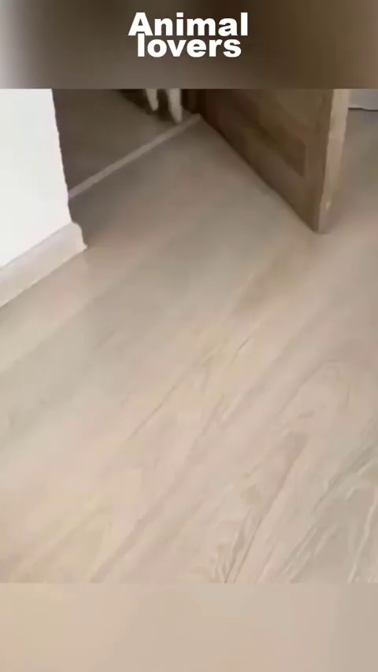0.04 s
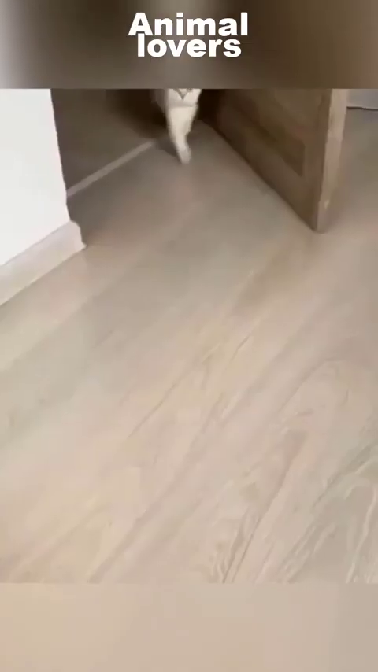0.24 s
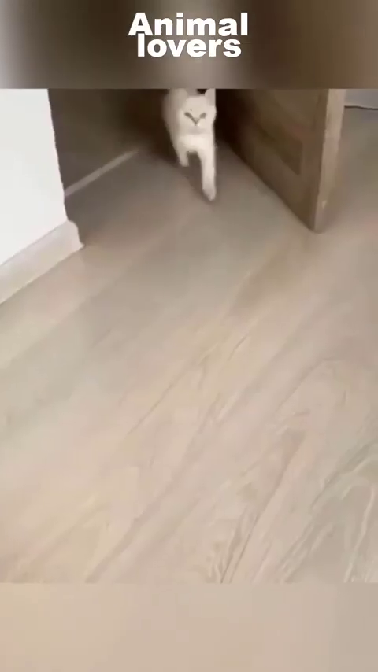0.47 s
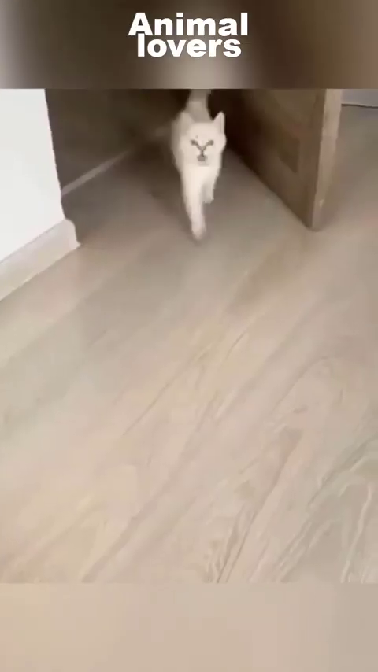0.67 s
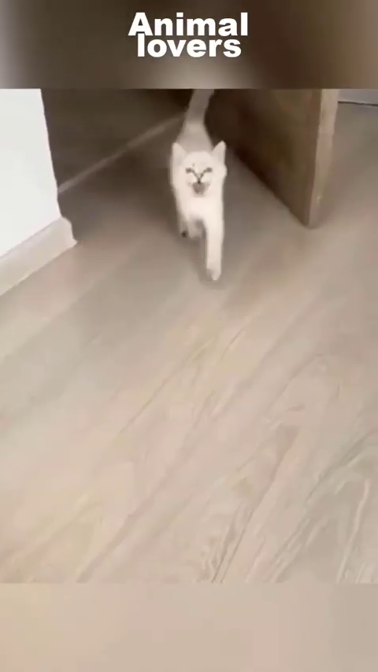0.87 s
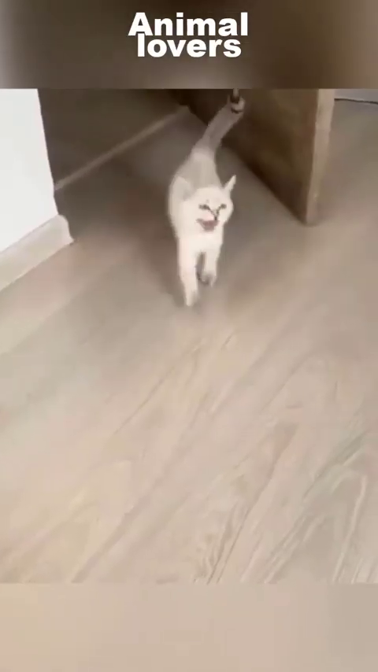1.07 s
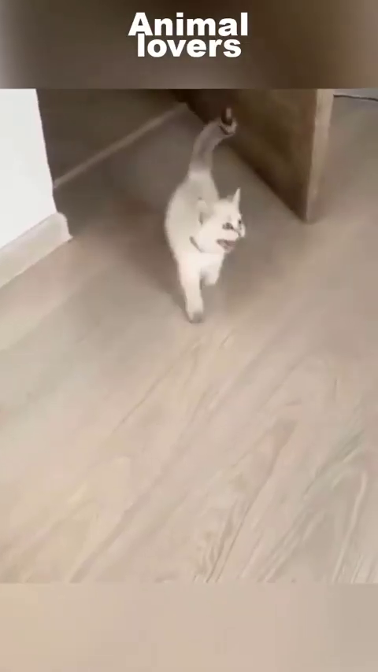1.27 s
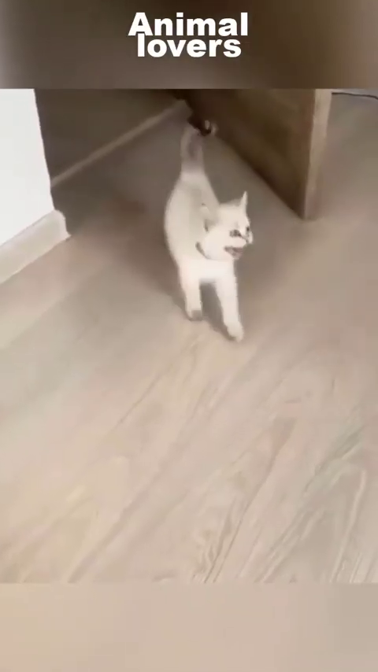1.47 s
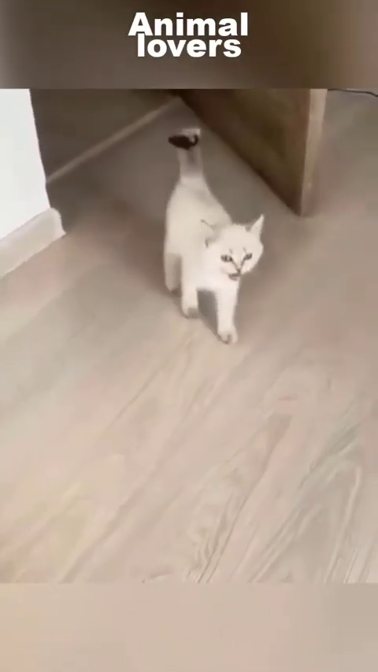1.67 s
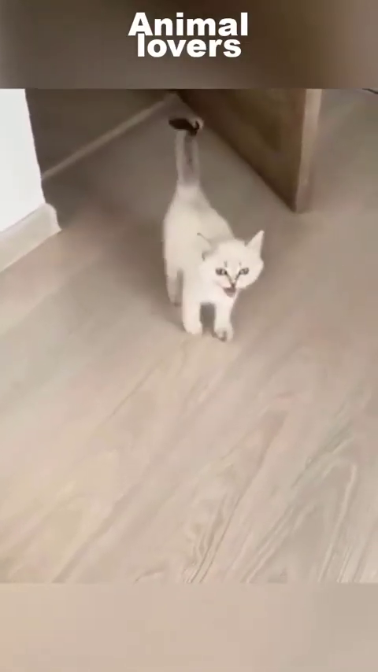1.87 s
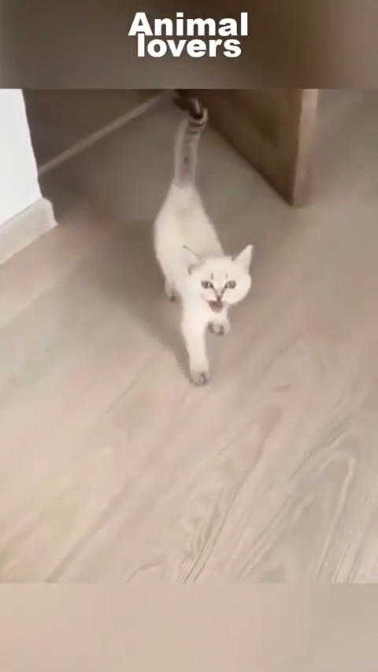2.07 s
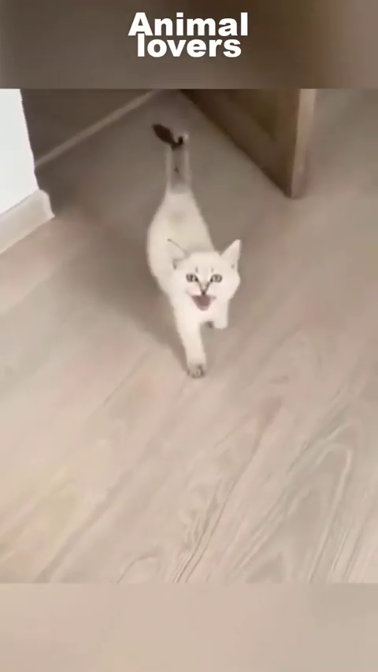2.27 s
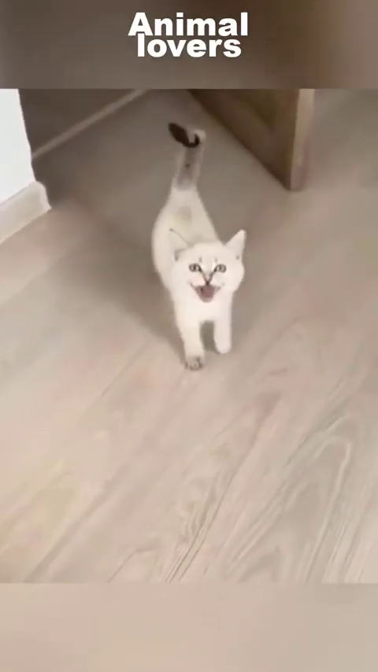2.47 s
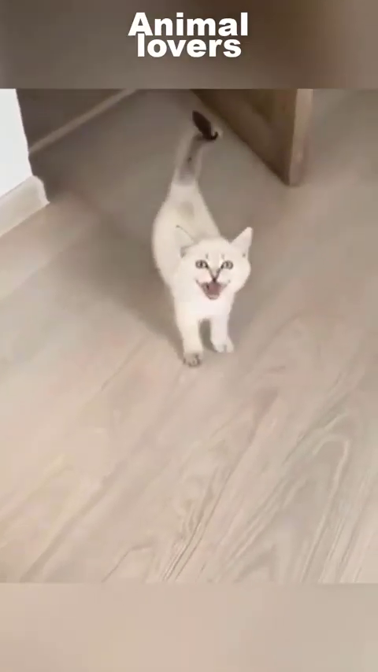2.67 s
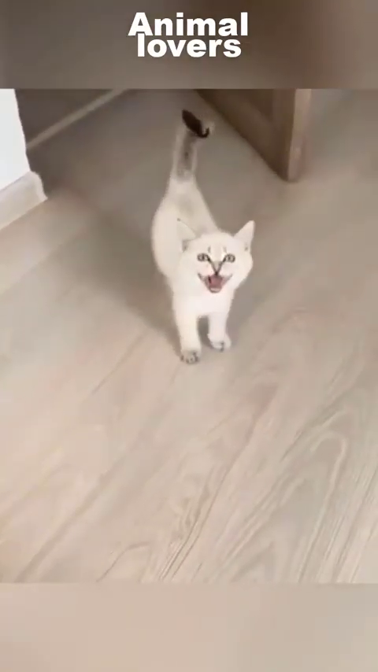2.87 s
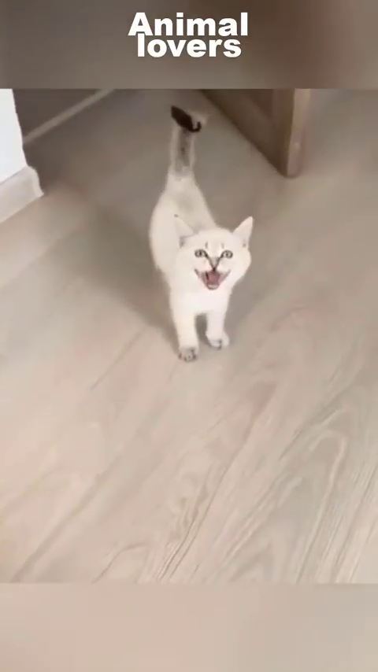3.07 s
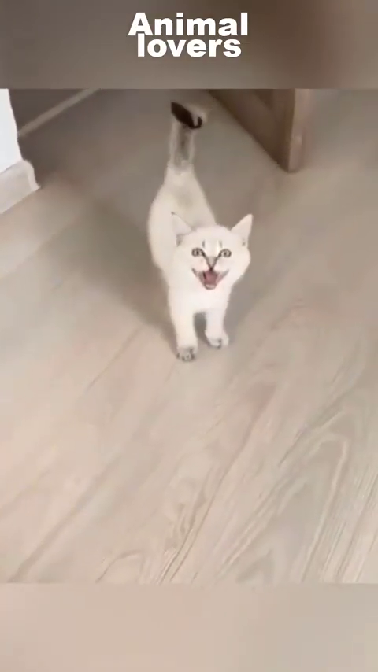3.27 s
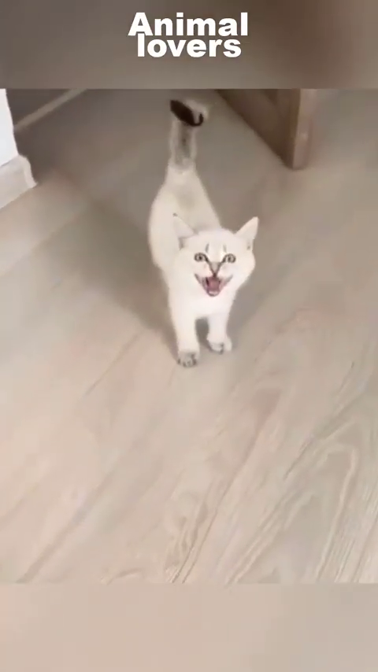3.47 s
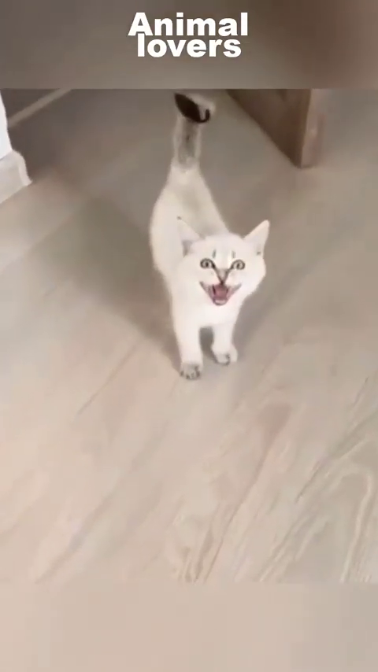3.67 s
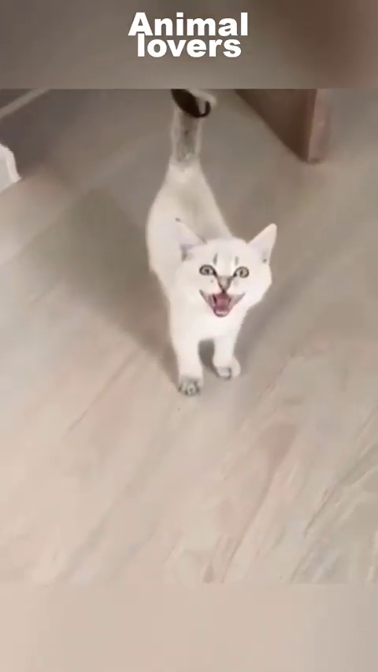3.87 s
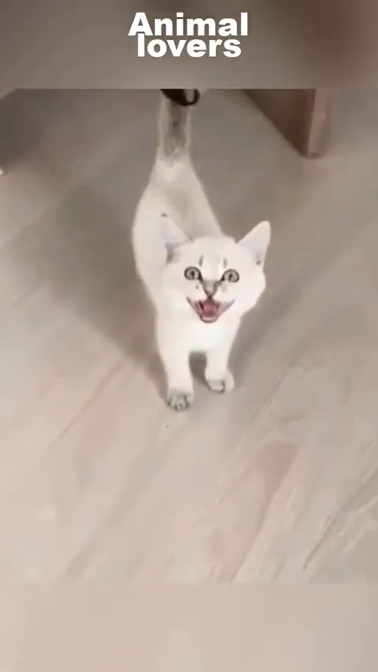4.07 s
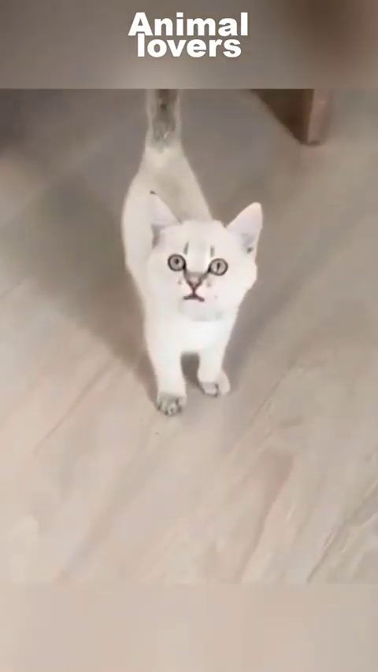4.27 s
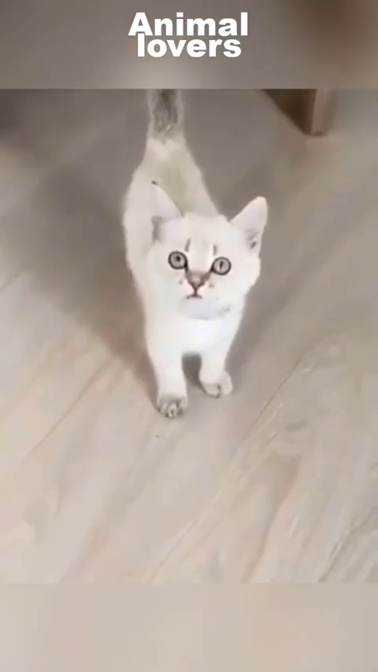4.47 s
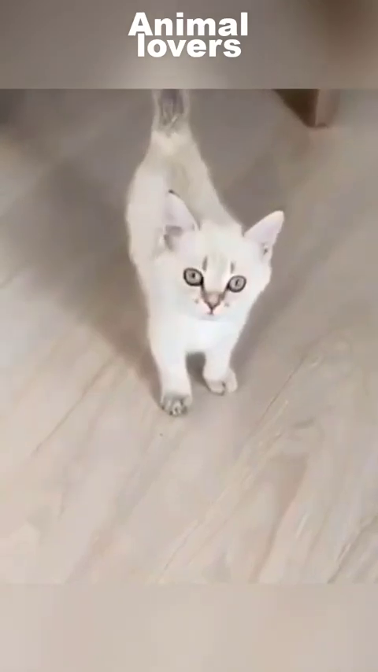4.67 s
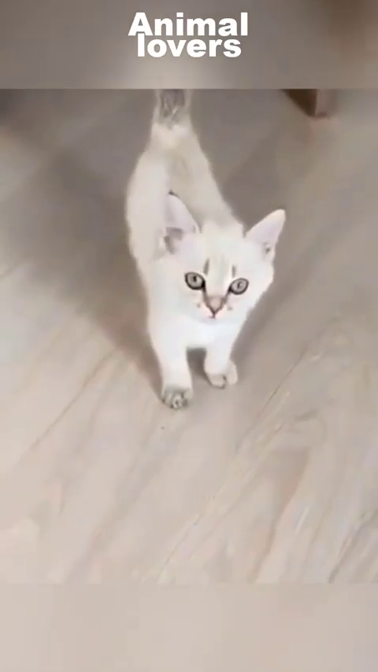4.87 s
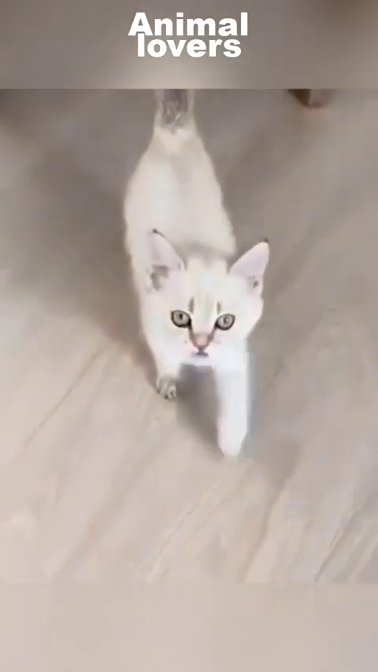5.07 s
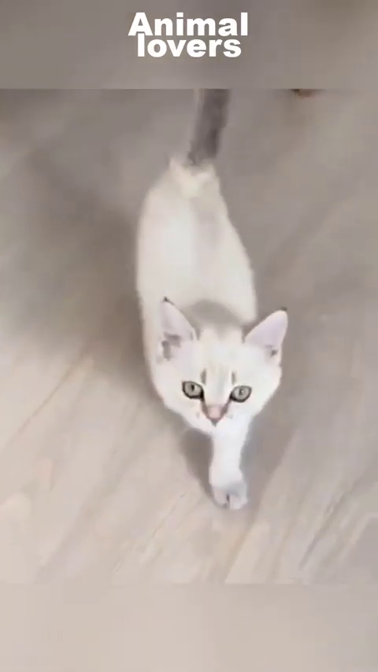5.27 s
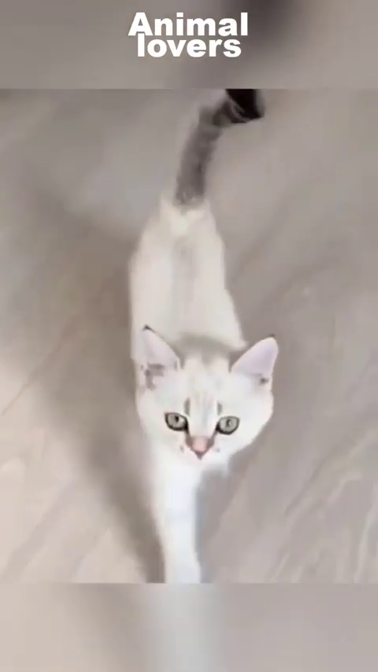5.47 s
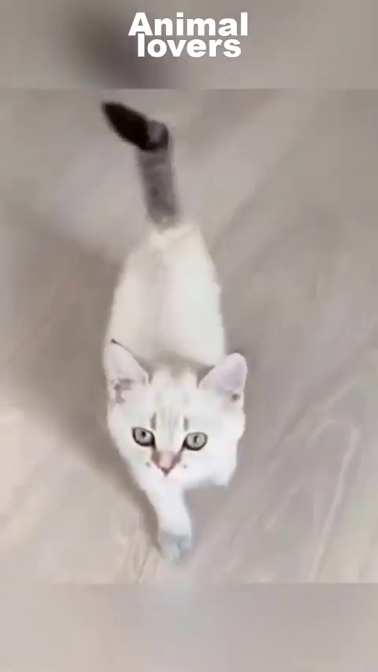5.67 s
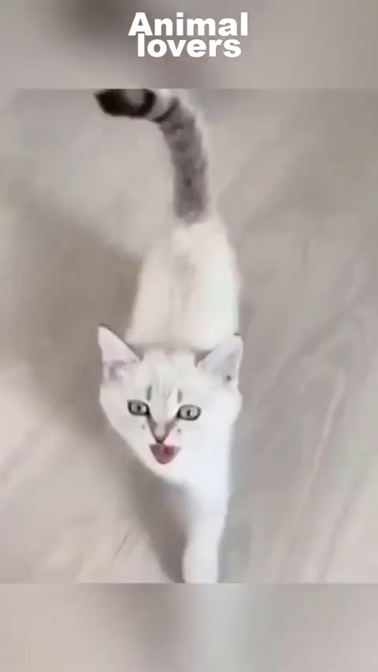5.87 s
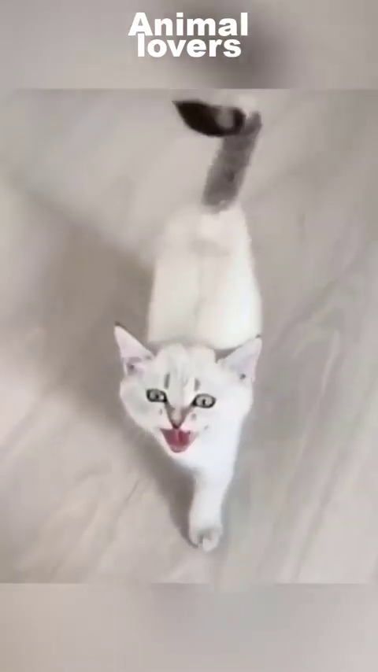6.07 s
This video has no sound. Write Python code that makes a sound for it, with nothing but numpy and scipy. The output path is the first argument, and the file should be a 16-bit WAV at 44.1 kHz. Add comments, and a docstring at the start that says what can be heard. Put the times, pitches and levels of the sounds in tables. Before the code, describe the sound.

One drawn-out, slowly falling kitten meow rings through a room, followed by soft paw steps on wood and a brief hoarse cry.

```python
"""A kitten on a wooden floor, in a bare, ringing room with a low rumble. First soft bumps, paws, wet smacks.
At 1 s one long, high meow: vocal folds through throat resonances, sinking in pitch, swelling as the mouth
widens. At 4.2 s the folds break into a rasp; the jaw snaps shut, pulling pitch and resonances down.
From 5 s claws tick, paws shuffle on the boards, the mouth smacks; echoes weaken as the kitten nears.
At 6 s a rough second cry begins."""
import sys
import numpy as np
from scipy import signal
from scipy.fft import rfft, irfft, next_fast_len
from scipy.io import wavfile
from scipy.ndimage import uniform_filter1d

SR = 44100
rng = np.random.default_rng(int(sys.argv[2]) if len(sys.argv) > 2 else 0)


def transcribe(signal):
    """Save signal, clipped to [-1, 1], as a 16-bit WAV file at the path in sys.argv[1]."""
    frames = np.atleast_2d(signal).T
    limited = np.clip(frames, -1, 1)
    pcm = np.round(limited * 32767).astype(np.int16)
    wavfile.write(sys.argv[1], SR, pcm)


N = 270333
TIME_S = np.arange(N) / SR

# meow melody: t/s, f/Hz
MEOW_PITCH = [(1.02, 866), (1.06, 910), (1.088, 989), (1.12, 962), (1.185, 973), (1.205, 1012),
              (1.235, 1022), (1.252, 990), (1.28, 935), (1.318, 921), (1.35, 919), (1.4, 903.6),
              (1.425, 910), (1.52, 866), (1.585, 840), (1.73, 845), (1.755, 819), (1.89, 824.6),
              (1.92, 851), (1.97, 854), (2.03, 877), (2.06, 897), (2.2, 902), (2.23, 887), (2.33, 893.3),
              (2.36, 868.5), (2.44, 846.4), (2.475, 858.7), (2.63, 842.6), (2.81, 844.4), (2.86, 823.4),
              (3.2, 812.5), (3.23, 799.4), (3.32, 809.6), (3.6, 806.5), (3.62, 796.6), (3.76, 803.5),
              (3.86, 786.4), (4.05, 788.8), (4.12, 782.2), (4.33, 784.2)]
# brief pitch dips: t/s, half length/s, depth/fraction of pitch
PITCH_CATCHES = [(1.677, 0.0088, 0.055), (1.884, 0.012, 0.019), (4.026, 0.0067, 0.011),
                 (4.201, 0.0078, 0.016), (4.241, 0.00748, 0.0794), (4.273, 0.00809, 0.0733),
                 (4.297, .006, 0.0492), (4.326, 0.00811, 0.0875), (4.357, 0.012, 0.14)]
# mouth: t/s, opening/0-1
MOUTH_OPENING = [(1., 0.51), (1.27, 0.1), (1.6, 0.28), (1.85, 0.06), (2.15, 0.29), (2.45, 0.75),
                 (3.3, 0.55), (3.62, 0.88), (4.18, 0.99), (4.3, 0.99)]
# throat response by mouth opening: f/Hz, narrow/dB, half open/dB, wide/dB
THROAT_RESPONSE = [(394.2, -32, -26, 5), (847, -8, -13.5, -10), (1598, 4, -2.5, 1.5), (2475, 3, 1, 3.5),
                   (3160, -11, -2.5, -1), (3398, 1.5, 2.5, 1.5), (3606, -6.5, 4, 6.5),
                   (3950, -16.5, -0.5, 13.5), (4317, -15.5, -4, 2), (4900, -11.5, -6, -6.5),
                   (5200, -6, 4, -8), (5540, -5, -10, -3.5), (6460, -22, -24, -14.5), (7050, -58, -86, -49),
                   (7680, -29, -15, -28), (8450, -25, -19, -15), (8960, -14, -18.5, -22),
                   (9340, -25.5, -16.5, -15), (10860, -19.5, -24.5, -22), (12570, -49, -34, -35)]
# folds take hold in two pushes, let go at the end: t/s, gain/1
FOLD_GRIP = [(1.01, 0), (1.03, .6), (1.06, .7), (1.095, 1.2), (1.16, .7), (1.21, .65), (1.26, 1.15),
             (1.35, 1), (4.22, 1), (4.25, .85), (4.38, .75), (4.43, .15)]
# fold rattle fraying the harmonics: t/s, depth/0-1
FOLD_RATTLE = [(1.0, .5), (1.1, .85), (1.22, .55), (1.27, .25), (1.34, .6), (1.43, .05), (1.6, .08),
               (1.68, .7), (1.76, .08), (2.2, 0), (3.4, 0), (3.7, .07), (4.2, .1)]
# voice cracks: t/s, time constant/s, added roughness/0-1
VOICE_CRACKS = [(1.275, 0.032, 0), (1.687, 0.11, 0.2), (2.367, 0.099, 0.04), (2.961, 0.072, 0.08),
                (3.722, 0.07, 0.01)]
# bright breath before the break: f/Hz, level/dB
WHISPER_SPECTRUM = [(400, -21), (1100, -14), (2000, 9), (3500, 5), (5700, 3), (7300, 5), (9800, -8),
                    (13000, -24)]
# darker breath after it: f/Hz, level/dB
RASP_SPECTRUM = [(300, -7), (600, -1), (1100, 7), (1800, 0), (2800, 3), (4200, -2.5), (5700, 1.5),
                 (7300, -25), (10000, -4), (13000, -21)]
# air pushes of the second cry: t/s, level/dB, fade/(dB/s)
CRY_PUSHES = [(6.016, -41, 13), (6.109, -30, 452)]
# throat in the second cry: f/Hz, level/dB
CRY_SPECTRUM = [(300, -8), (850, -3), (2200, -4.5), (3200, -10), (4800, -12), (7000, -22), (12000, -22)]
# lip and tongue smacks: t/s, level/dB, time constant/s, treble/dB
SMACKS = [(0.388, -41.5, 0.0016, 5), (0.789, -43, 0.0031, 6), (0.943, -27.5, 0.00043, 9),
          (1.046, -26, 0.0018, 17), (4.449, -15.5, 0.0031, -9), (5.539, -17, 0.0021, -3),
          (5.799, -26, 0.006, -4.5), (6.0154, -9.5, 0.0011, -8)]
# mouth cavity: f/Hz, width/Hz, level/dB
MOUTH_MODES = [(1003, 590, 1), (1505, 490, 4), (3770, 1120, 1.5), (4830, 2300, 8.5), (10300, 2800, -7)]
# claw ticks: t/s, level/dB
CLAW_TICKS = [(5.05, -37), (5.110, -35), (5.239, -37), (5.336, -37), (5.485, -38)]
# boards under a claw: f/Hz, width/Hz, level/dB
BOARD_MODES = [(1060, 550, 9.5), (2190, 550, 8.5), (4440, 1400, -25)]
# paws and fur on the floor: t/s, half length/s, thud/dB, scuff/dB
SHUFFLES = [(0.56, 0.084, -44, -69.5), (0.794, 0.06, -52, -70), (5.212, 0.12, -40.5, -63),
            (5.308, 0.072, -51, -57.5), (5.55, 0.034, -43, -76), (5.816, 0.081, -45.5, -52.5),
            (5.973, 0.11, -44.5, -70)]
# boards under a paw: f/Hz, level/dB
THUD_SPECTRUM = [(25, -40), (59, 12), (100, 1.5), (151, 2), (294, 6.5), (527, -14), (960, -17), (1630, -40),
                 (2260, -22.5), (6000, -41), (7800, -64), (13200, -120)]
# paws and fur rubbing: f/Hz, level/dB
SCUFF_SPECTRUM = [(1000, -19), (3000, -3), (5000, -6), (7300, -19), (10000, -4.5), (13000, -16)]
# dull bumps: t/s, level/dB, f/Hz, width/Hz, time constant/s
BUMPS = [(0.472, -36, 275, 133, 0.018), (0.622, -41, 109, 90, 0.0088), (1.003, -43, 660, 413, 0.0046),
         (3.377, -44, 600, 262, 0.04), (5.782, -33, 82, 71, 0.025), (3.712, -23, 505, 190, .008),
         (4.457, -20.5, 200, 150, .006), (4.468, -28, 370, 220, .012)]
# reverberation time: f/Hz, T60/s
ROOM_DECAY = [(150, 1.1), (2000, 1.2), (3900, 0.78), (6000, 0.85), (9000, 0.5), (14000, 0.55)]
# echo colour: f/Hz, level/dB
ECHO_SPECTRUM = [(200, -5.5), (600, -2.5), (3000, 1.5), (6000, 2.5), (9000, 4.0)]
# room noise: f/Hz, level/dB
BACKGROUND_SPECTRUM = [(25, -12), (62, 1.5), (110, -4), (200, -8.5), (400, -17), (1000, -23), (3000, -31.5),
                       (6000, -34), (8000, -44.5), (13000, -42.5)]

MEOW_START_S, BREAK_S, CRUMBLE_S, MEOW_END_S = 0.94, 4.201, 4.22, 4.444


def meow(jaw_close_s=4.335, pitch_drop=0.1187, throat_drop=0.32, wide_mouth_db=8):
    """Folds, croak and breath, louder through a wide mouth; the closing jaw lowers pitch and throat."""
    level_db, rough = effort()
    closing = ramp(jaw_close_s, 0.1) ** 2
    catch = sum(depth * swell(t_s, half_s) for t_s, half_s, depth in PITCH_CATCHES)
    pitch_hz = curve(MEOW_PITCH) * (1 - catch - pitch_drop * closing)
    opening = curve(MOUTH_OPENING)
    throat_scale = 1 - throat_drop * closing
    air = breath(rough)
    voice = curve(FOLD_GRIP) * vocal_folds(pitch_hz, rough, opening, throat_scale)
    gate = uniform_filter1d(1. * ((TIME_S >= MEOW_START_S) & (TIME_S <= MEOW_END_S)), size=200)
    return (voice + croak(throat_scale) + air) * undb(level_db + wide_mouth_db * opening) * gate


def effort(attack_db=17.5, swell_db_per_s=2, fade_db_per_s=31, settle_s=0.14):
    """Meow level/dB and roughness/0-1: the folds start hoarse, settle, swell, then break up."""
    held_s = np.minimum(since(MEOW_START_S), BREAK_S - MEOW_START_S)
    onset_db = -34.5 - attack_db * (1 - ramp(MEOW_START_S, 0.3))
    level_db = onset_db + swell_db_per_s * held_s - fade_db_per_s * since(BREAK_S)
    hoarse = 0.9 * np.exp(-held_s / settle_s)
    cracks = sum(depth * np.exp(-np.abs(TIME_S - t_s) / tau_s) for t_s, tau_s, depth in VOICE_CRACKS)
    crumble = ramp(CRUMBLE_S, 0.18) ** 2
    return level_db, np.clip(0.03 + hoarse + cracks + crumble, 0, 1)


def vocal_folds(pitch_hz, rough, opening, throat_scale, jitter=0.0758, shimmer=0.065, flutter_db=0.72):
    """Fold harmonics shaped by the throat; roughness shakes their rate and swing."""
    tremble = 0.0027 * wander(28) + .03 * rough * wander(45)
    fold_hz = pitch_hz * (1 + tremble + jitter * rough ** 2 * wander(614))
    phase = 2 * np.pi * np.cumsum(fold_hz) / SR
    rattle = curve(FOLD_RATTLE)
    tone, power = 0, 0
    for k in range(1, 18):
        gain = throat_gain(k * pitch_hz, opening, throat_scale)
        skirt = .8 * rough * np.sqrt(k)  # sidebands from uneven closures
        fray = rattle * wander(120)
        swing = 1 + skirt * wander(60 + 10 * k)
        tone += gain * (swing * np.sin(k * phase) + fray * np.cos(k * phase))
        power += gain ** 2 * (1 + skirt ** 2 + rattle ** 2) / 2
    return tone / np.sqrt(power) * (1 + shimmer * rough * wander(120)) * undb(flutter_db * wander(35))


def throat_gain(f_hz, opening, throat_scale, strain_s=4.06, strain_db=6.5):
    """A wider mouth brings out the resonance near 4 kHz; strain lifts the top overtones."""
    grid_hz, *shapes_db = np.transpose(THROAT_RESPONSE)
    gain_db = 0
    for i, shape_db in enumerate(shapes_db):
        share = np.maximum(1 - np.abs(2 * opening - i), 0)
        gain_db += share * np.interp(f_hz / throat_scale, grid_hz, shape_db)
    return undb(gain_db + strain_db * ramp(strain_s, 0.074) * (f_hz > 6900))


def breath(rough, whisper_db=3, rasp_db=-5):
    """Air hisses past the teeth as the folds lose grip; after the break their flapping chops it."""
    flaps = 1 + .3 * wander(200)
    whisper = undb(whisper_db) * unit(colour(noise(), WHISPER_SPECTRUM))
    rasp = undb(rasp_db) * unit(flaps * colour(noise(), RASP_SPECTRUM))
    return np.where(TIME_S < BREAK_S, whisper, rasp) * rough ** 3


def croak(throat_scale, resonance_hz=3550, half_width_hz=525, level_db=-2):
    """Turbulence in a throat resonance that sinks with the jaw, chopped by the flapping folds."""
    carrier = np.sin(2 * np.pi * np.cumsum(resonance_hz * throat_scale) / SR)
    turbulence = carrier * wander(half_width_hz)
    flaps = 1 + 0.5 * wander(170)
    return undb(level_db) * unit(turbulence * flaps) * ramp(CRUMBLE_S, MEOW_END_S - CRUMBLE_S) ** 2


def second_cry(start_hz=670, rise_hz_per_s=520):
    """Hoarse, barely pitched air through the throat: a soft push, then a hard one."""
    pitch_hz = start_hz + rise_hz_per_s * since(CRY_PUSHES[0][0])
    push = sum((TIME_S > t_s) * undb(db - db_per_s * since(t_s)) for t_s, db, db_per_s in CRY_PUSHES)
    air = unit(colour(noise(), CRY_SPECTRUM))
    phase = 2 * np.pi * np.cumsum(pitch_hz * (1 + 0.14 * wander(220))) / SR
    return air * (1 + 0.15 * np.sin(phase)) * push


def smacks():
    """A saliva film tears; the crackle rings the mouth cavity."""
    sound = 0
    for t_s, level_db, tau_s, treble_db in SMACKS:
        modes = [(f_hz, width_hz, db + treble_db * (f_hz > 3000)) for f_hz, width_hz, db in MOUTH_MODES]
        sound += burst(t_s, level_db, tau_s, modes)
    return sound


def claws(tau_s=0.0014):
    """Claws tick on the boards and ring them briefly."""
    return sum(burst(t_s, level_db, tau_s, BOARD_MODES) for t_s, level_db in CLAW_TICKS)


def paws(contacts_per_s=900, spread_db=7.5):
    """Swells of tiny contacts thud in the boards, a thin scuff above."""
    contacts = (rng.random(N) < contacts_per_s / SR) * np.sign(noise())
    force = undb(spread_db * np.minimum(rng.exponential(size=N), 4))
    thud = unit(colour(contacts * force, THUD_SPECTRUM))
    scuff = unit(colour(noise(), SCUFF_SPECTRUM))
    return sum(swell(t_s, half_s) * (undb(thud_db) * thud + undb(scuff_db) * scuff)
               for t_s, half_s, thud_db, scuff_db in SHUFFLES)


def bumps():
    """Soft knocks, each with one short, low ring."""
    return sum(burst(t_s, db, tau_s, [(f_hz, width_hz, 0)]) for t_s, db, f_hz, width_hz, tau_s in BUMPS)


def room_echoes(x, shift_hz=1.8, gain_db=1.83):
    """The kitten moves, so its echoes drift between two patterns."""
    angle = 2 * np.pi * shift_hz * np.cumsum(1 + wander(3)) / SR
    shares = np.cos(angle), np.sin(angle)
    wet = sum(signal.fftconvolve(x * share, room_response())[:N] for share in shares)
    return undb(gain_db) * colour(wet, ECHO_SPECTRUM)


def room_response(early_db=-7, early_t60_s=0.15, late_db=-13.5):
    """Near floor and walls answer at once; the room rings on, losing treble first."""
    t_s = TIME_S[:SR]
    f_hz = np.fft.rfftfreq(SR, 1 / SR)
    spectrum = rfft(rng.standard_normal(SR))
    edges_hz = np.append(0, np.geomspace(200, SR / 2, num=14))
    late = 0
    for low_hz, high_hz in zip(edges_hz, edges_hz[1:]):
        band = irfft(spectrum * ((f_hz >= low_hz) & (f_hz < high_hz)), SR)
        late += band * undb(-60 * t_s / lookup(ROOM_DECAY, (low_hz + high_hz) / 2))
    late *= np.clip((t_s - .008) / 0.0015, 0, 1)
    reflections = rng.standard_normal(SR) * (rng.random(SR) < .03) * (t_s > .003)
    early = reflections * undb(-60 * t_s / early_t60_s)
    return (undb(early_db) * unit(early) + undb(late_db) * unit(late)) / np.sqrt(SR)


def background(full_s=0.212, dip_s=0.051, grow_s=3.4, grow_db_per_s=3):
    """Wavering rumble under an even hiss: starts faint, dips briefly, comes in fully, later grows."""
    lead_in_db = np.where(TIME_S < full_s - dip_s, -68, -95)
    level_db = np.where(TIME_S < full_s, lead_in_db, -56 + grow_db_per_s * since(grow_s))
    steady = unit(colour(noise(), BACKGROUND_SPECTRUM))
    rumble = signal.sosfiltfilt(signal.butter(2, 200, fs=SR, output="sos"), steady)
    waver = undb(2 * wander(8)) - 1
    return (steady + waver * rumble) * undb(uniform_filter1d(level_db, size=400))


def burst(centre_s, peak_db, tau_s, modes):
    """A short rattle of pushes rings modes: f/Hz, width/Hz, level/dB."""
    t_s = np.arange(-SR // 10, SR // 4) / SR
    push = rng.standard_normal(len(t_s)) * np.exp(-np.abs(t_s) / tau_s)
    sound = sum(undb(db) * ring(push, f_hz, width_hz) for f_hz, width_hz, db in modes)
    sound *= undb(peak_db) / np.abs(sound).max()
    return np.interp(TIME_S - round(centre_s * SR) / SR, t_s, sound, left=0, right=0)


def ring(x, f_hz, width_hz):
    """Steep resonance, gain 1 at its centre."""
    b, a = signal.iirpeak(f_hz, f_hz / width_hz, fs=SR)
    return signal.lfilter(b, a, signal.lfilter(b, a, x))


def colour(x, spectrum):
    """Filter by a spectrum: f/Hz, level/dB."""
    size = next_fast_len(N + SR // 2)
    gain = undb(lookup(spectrum, np.fft.rfftfreq(size, 1 / SR)))
    return irfft(rfft(x, size) * gain, size)[:N]


def lookup(points, f_hz):
    """Interpolate (f/Hz, value) points over log frequency."""
    grid_hz, values = np.transpose(points)
    return np.interp(np.log(np.maximum(f_hz, 1)), np.log(grid_hz), values)


def curve(points):
    """Interpolate (t/s, value) points per sample."""
    return np.interp(TIME_S, *np.transpose(points))


def noise():
    """White noise."""
    return rng.standard_normal(N)


def wander(cutoff_hz):
    """Low-passed noise, rms 1."""
    return unit(signal.sosfilt(signal.butter(4, cutoff_hz, fs=SR, output="sos"), noise()))


def since(start_s):
    """Seconds since start_s, 0 before."""
    return np.maximum(TIME_S - start_s, 0)


def ramp(start_s, length_s):
    """Linear rise from 0 to 1."""
    return np.minimum(since(start_s) / length_s, 1)


def swell(centre_s, half_s):
    """Gaussian rise and fall, peak 1."""
    return np.exp(-((TIME_S - centre_s) / half_s) ** 2)


def undb(db):
    """Decibels to gain."""
    return 10 ** (np.asarray(db) / 20)


def unit(x):
    """Scale to rms 1."""
    return x / np.sqrt(np.mean(x ** 2))


def scene(approach_s=5.52, approach_db_per_s=8.5, bump_send_db=2):
    """Kitten, bumps and room, centred; the kitten's echoes weaken as it nears the phone."""
    kitten = meow() + second_cry() + smacks() + claws() + paws()
    knocks = bumps()
    kitten_send = undb(-approach_db_per_s * since(approach_s))
    echoes = room_echoes(kitten_send * kitten + undb(bump_send_db) * knocks)
    mono = undb(-3.5) * (kitten + knocks + echoes) + background()
    return np.array([mono, mono])


def record(dry):
    """The phone cuts the treble above 13.1 kHz."""
    return signal.sosfilt(signal.ellip(8, .2, 70, 13100, fs=SR, output="sos"), dry)


dry = scene()
out = record(dry)
transcribe(out)
```